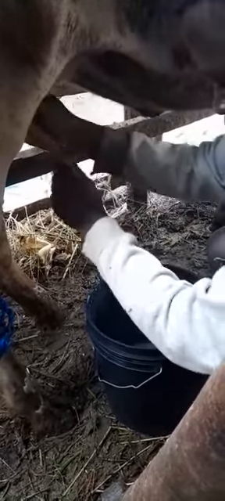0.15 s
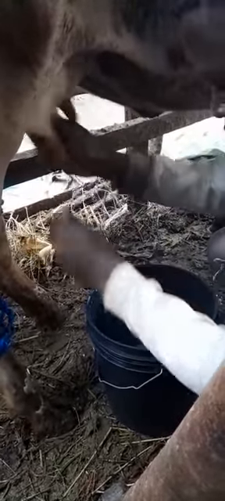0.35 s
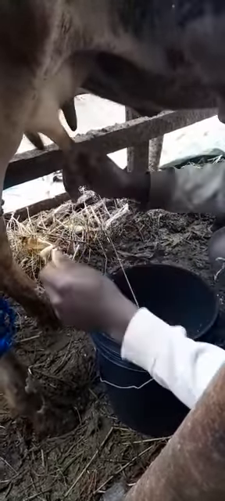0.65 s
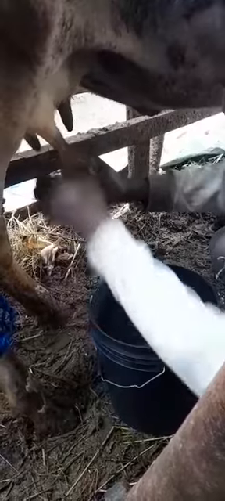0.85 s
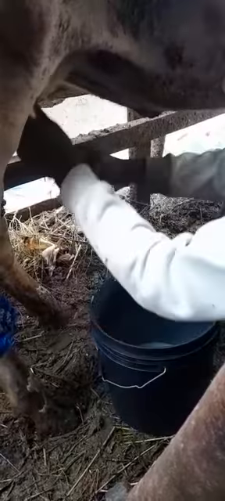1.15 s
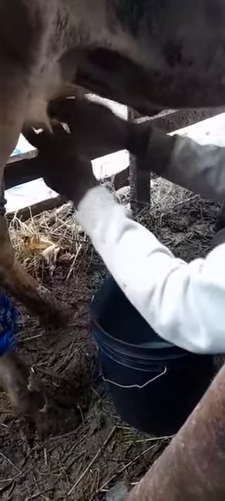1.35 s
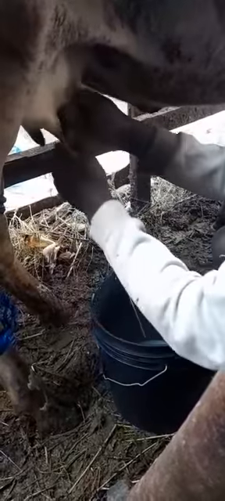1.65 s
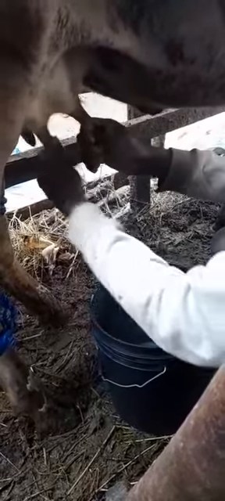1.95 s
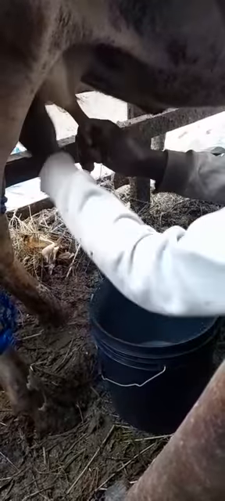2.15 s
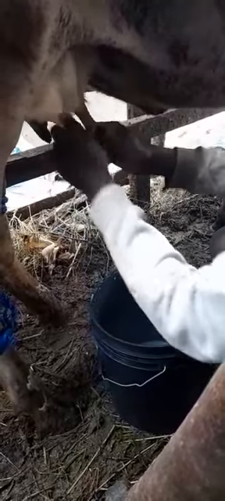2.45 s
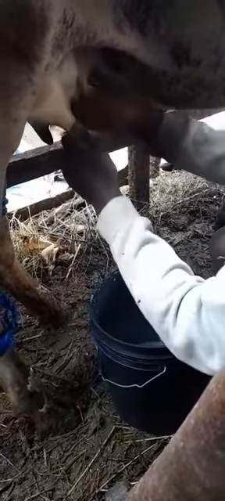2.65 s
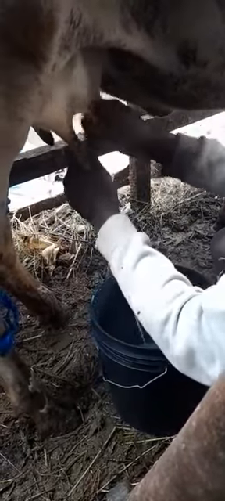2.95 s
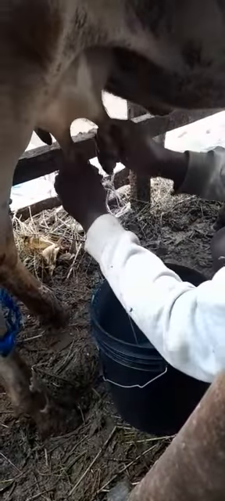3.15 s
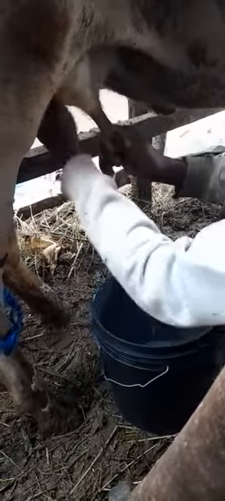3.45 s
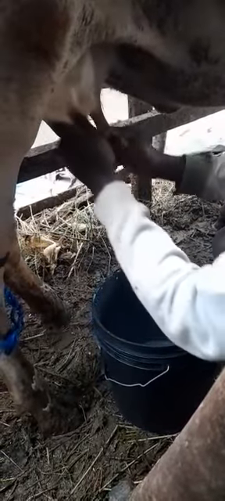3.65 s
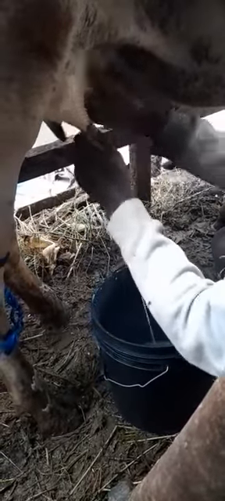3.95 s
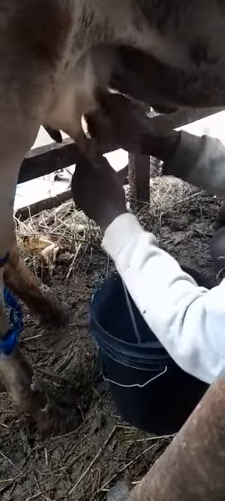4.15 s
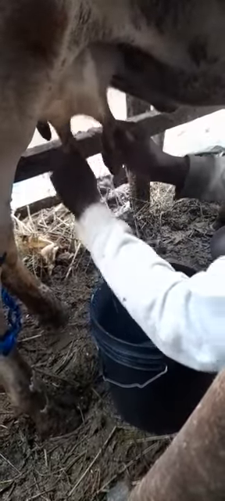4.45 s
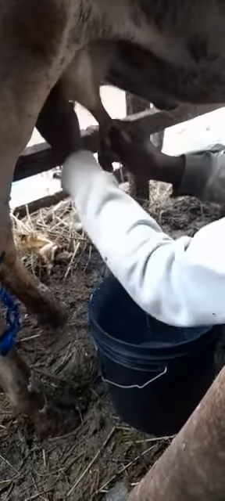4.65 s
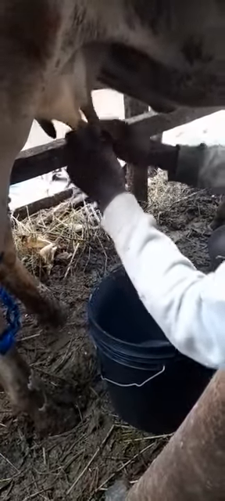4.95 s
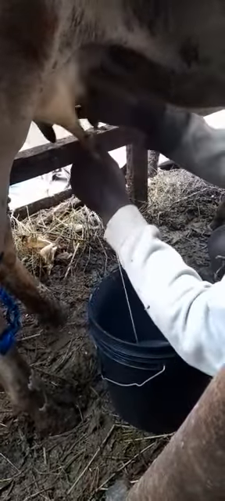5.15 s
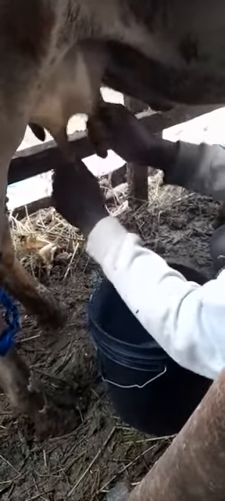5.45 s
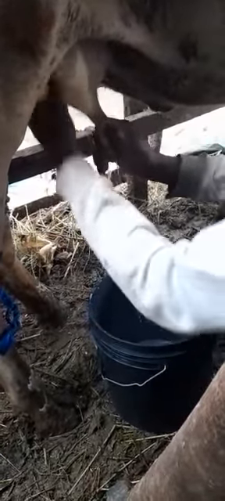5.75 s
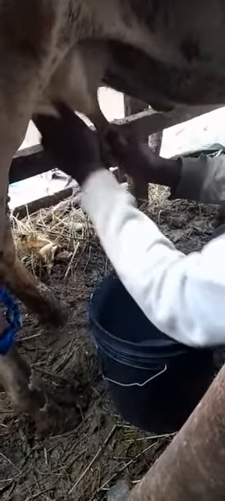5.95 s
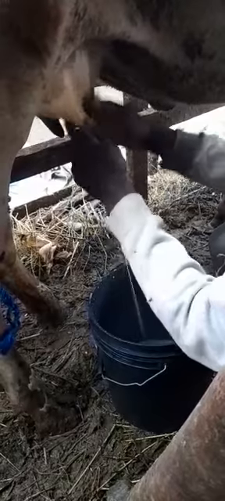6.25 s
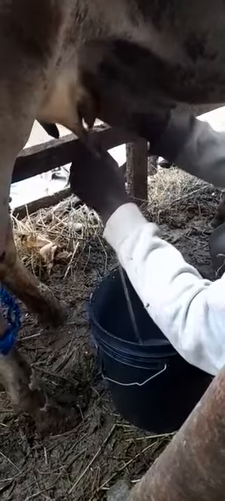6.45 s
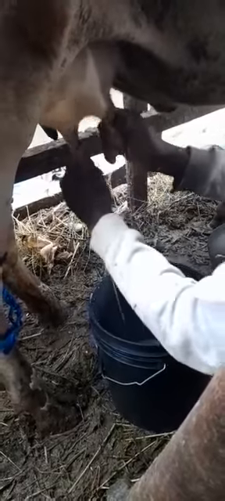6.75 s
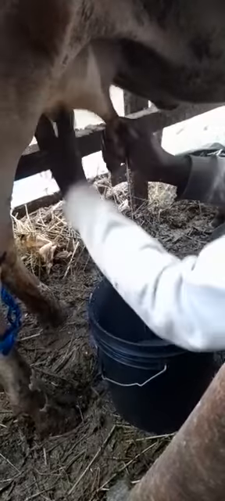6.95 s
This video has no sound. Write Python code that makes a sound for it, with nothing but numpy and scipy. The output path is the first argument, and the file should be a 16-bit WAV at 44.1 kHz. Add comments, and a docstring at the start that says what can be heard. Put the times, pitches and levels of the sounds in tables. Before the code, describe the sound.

Close up, a cow is hand-milked: wet spurts swish into a pail in uneven pulses, foam crackling and bubbles gurgling between short lulls.

```python
"""Milking a cow by hand

A cow is milked by hand into a plastic bucket, close by, in a quiet straw-floored pen.
Each pull drives a jet into the frothy milk: swarms of chirping bubbles, a fizz of foam clicks
and filtered noise for the dull drumming of the pail. Hard jets bore gurgling hollows, most of them
sinking in pitch; slaps, stray drops and booming gulps join in, and most of it echoes in the bucket."""
import sys
import numpy as np
from scipy import signal
from scipy.fft import rfft, irfft, next_fast_len
from scipy.io import wavfile
from scipy.ndimage import uniform_filter1d, map_coordinates

SR = 44100
rng = np.random.default_rng(int(sys.argv[2]) if len(sys.argv) > 2 else 0)


def generate_wav(sig):
    """Save sig (samples, or channels by samples) to the path in sys.argv[1] as 16-bit PCM at SR."""
    pcm = np.round(np.clip(np.atleast_2d(sig).T, -1, 1) * 32767).astype(np.int16)
    wavfile.write(sys.argv[1], SR, pcm)


N = 313551  # length [samples]


def amp(db):
    """Turn decibels into a gain."""
    return 10 ** (np.asarray(db) / 20)


def unit(x):
    """Scale to an rms (average strength) of 1."""
    return x / np.sqrt(np.mean(x ** 2) + 1e-20)


def along(points, hz):
    """Read a curve of (frequency [Hz], value) points on a log frequency axis."""
    f, v = np.transpose(points)
    return np.interp(np.log(hz + 1), np.log(f + 1), v)


def wobble(rate):
    """A smooth random curve with `rate` random points a second."""
    points = rng.standard_normal(int(N * rate / SR) + 4)
    return map_coordinates(points, [np.arange(N) * rate / SR])


def coloured(x, spectrum, modes=()):
    """Filter with a broad tone curve plus resonant humps or dips; nothing sounds before its cause."""
    m = 2 * next_fast_len(N // 2 + SR // 4)
    hz = np.fft.rfftfreq(m, 1 / SR)
    db = along(spectrum, hz)
    for centre, width, boost in modes:
        db = db + boost / (1 + (2 * (hz - centre) / width) ** 2)
    # folding the cepstrum forward in time gives the filter its minimum phase
    cepstrum = irfft(np.log(amp(db)))
    cepstrum[1:m // 2] *= 2
    cepstrum[m // 2 + 1:] = 0
    response = np.exp(rfft(cepstrum))
    return irfft(rfft(x, m) * response, m)[..., :N]


# how alike left and right are: (frequency [Hz], likeness [0 to 1])
LIKENESS = [(60, 0.91), (280, 0.93), (600, 0.6), (1200, 0.098), (3000, 0.12), (12000, 0.2)]


def spread(pair):
    """Mix two signals into left and right, nearly alike in the bass and wide higher up."""
    a, b = rfft(pair)
    likeness = along(LIKENESS, np.fft.rfftfreq(N, 1 / SR))
    turn = np.arccos(np.clip(likeness, -1, 1)) / 2
    mid, side = a * np.cos(turn), b * np.sin(turn)
    return irfft(np.array([mid + side, mid - side]), N)


def steady(pair, size=3000):
    """Hold the short-term rms of the centre near 1, keeping the fine grain; size in samples."""
    power = uniform_filter1d(uniform_filter1d(pair.mean(0) ** 2, size), size)
    return pair / np.sqrt(np.abs(power) + power.mean() / 10 ** 4)


def bubbles(at, hz, gain, cycles, rise, size=256):
    """Damped sines that start at given samples and chirp upward as bubbles near the surface."""
    k = np.arange(size)
    turns = hz[:, None] * k / SR
    age = turns / cycles
    ring = np.sin(2 * np.pi * turns * (1 + rise * age / (1 + age)))
    wave = gain[:, None] * np.exp(-age) * ring * (1 - k / size)
    return np.bincount((at[:, None] + k).ravel(), wave.ravel(), N + size)[:N]


def walls(x, t60, direct, late_db, late_t60, drift=0.51, size=512):
    """Echoes in the bucket and a faint tail from the pen; paths drift as the jet wanders; t60s in s."""
    t = np.arange(8 * size) / SR
    pieces = np.pad(x, (0, -N % size)).reshape(-1, size)
    paths = rng.standard_normal((2, len(pieces), len(t)))
    # each moment keeps most of the last one's paths
    paths = signal.lfilter([1], [1, -np.exp(-drift ** 2)], paths, axis=1)
    echo = paths * (amp(-60 * t / t60) + amp(late_db - 60 * t / late_t60))
    echo /= np.linalg.norm(echo, axis=2, keepdims=True)
    echo[:, :, 0] += direct
    heard = signal.fftconvolve(pieces[None], echo, axes=2)
    # lay the overlapping pieces back in a row
    at = np.arange(len(pieces))[:, None] * size + np.arange(heard.shape[2])
    return np.array([np.bincount(at.ravel(), side.ravel())[:N] for side in heard])


# tone of the still air: (frequency [Hz], relative level [dB])
AIR_TONE = [(15, -45), (25, -25.5), (137, 4), (416, -19), (463, -16.5), (1560, -20), (4870, -14),
            (7510, -31.5), (14000, -27.5), (16000, -47)]
# a faint far drone: (frequency [Hz], rms level [dB])
DRONE = [(63, -81.5), (139, -77.5)]


def pen(air_db, waver):
    """Faint outdoor air is filtered noise; the drone is sines whose phase wavers (in radians)."""
    t = np.arange(N) / SR
    drone = np.zeros(N)
    for hz, db in DRONE:
        drone += amp(db) * np.sqrt(2) * np.sin(2 * np.pi * hz * t + waver * wobble(4.1))
    air = unit(coloured(spread(rng.standard_normal((2, N))), AIR_TONE))
    return amp(air_db) * air + drone


# tone of the drumming: (frequency [Hz], relative level [dB])
DRUM_TONE = [(25, -23.5), (60, -5), (110, -3.5), (200, -5.5), (330, -3), (380, -6.5), (500, -4.5), (800, 1),
             (1600, -69.5)]
# resonances of the pail and its load: (frequency [Hz], width [Hz], boost [dB])
PAIL_RINGS = [(139, 11, 9), (210.4, 22, 7), (268, 35, 10.5), (315, 26.5, 10.5)]


def drumming(push_db, level_db, flutter_db):
    """The uneven push of the jet, as fluttering noise, shakes the pail and the air column in it."""
    force = spread(rng.standard_normal((2, N))) * amp(flutter_db * wobble(45))
    return unit(coloured(force, DRUM_TONE, PAIL_RINGS)) * amp(push_db + level_db)


# heavy gulps that boom in the pail: (time [s], relative level [dB])
GULP_TIMES = [(0.572, -46), (1.985, -41), (2.891, -47), (3.69, -38), (4.548, -46), (5.42, -39),
              (5.876, -36)]


def gulps(level_db, t60):
    """A big pocket of air caves in and sets the pail booming: a low sine that dies away."""
    t = np.arange(N) / SR
    out = np.zeros(N)
    for s, db in GULP_TIMES:
        age = np.maximum(t - s, 0)
        hz = 275 * (1 + 0.021 * rng.standard_normal())
        swell = (1 - np.exp(-age / 0.0016)) * amp(db + level_db - 60 * age / t60)
        out += swell * np.sin(2 * np.pi * hz * age)
    return out


def droplets(fizz_db, level_db, scatter_db, count=260):
    """Stray beads of spray click against the bucket's wall, louder when the froth is busy."""
    at = rng.integers(0, N, count)
    click_db = fizz_db[at] + level_db + scatter_db * rng.uniform(-1.1, 1, count)
    gain = amp(click_db) * rng.choice([-1, 1], count)
    tone = [(500, -21.5), (1500, 1), (5000, 10), (8000, -16.5), (12000, 3.5), (16000, -9.5)]
    ticks = coloured(np.bincount(at, gain, N), tone)
    return walls(ticks, t60=.014, direct=.7, late_db=-27.5, late_t60=.12)


# tone of the fizz: (frequency [Hz], relative level [dB])
FOAM_TONE = [(3000, -15), (6000, -1), (8500, -9), (10500, -1.5), (12300, 1), (14000, -0.5), (16000, -7.5)]
# larger cells of froth that snap: (time [s], relative level [dB])
SNAP_TIMES = [(0.4825, -46), (0.6975, -22), (0.858, -22.5), (2.338, -54), (2.781, -23.5), (3.628, -21.5),
              (3.6998, -28.5), (3.881, -22.5), (3.9631, -22), (4.0546, -17.5), (4.209, -21), (4.6156, -30),
              (5.07, -22), (6.2798, -30)]


def foam(fizz_db, level_db, scatter_db, clump_db, clump_t60, snap_db, count=40000, size=1100):
    """Froth bursts as clumped clicks: one cell goes and its neighbours follow; snaps are short noise."""
    t = np.arange(SR // 20) / SR
    collapse = amp(-60 * t / clump_t60)
    starts = np.bincount(rng.integers(0, N, size), amp(clump_db * rng.standard_normal(size)), N)
    # a constant share of clicks falls outside the clumps
    clumps = np.sqrt(np.abs(signal.fftconvolve(starts ** 2, collapse ** 2)[:N]) + 1.3)
    cells = amp(scatter_db * rng.standard_normal(count)) * rng.choice([-1, 1], count)
    clicks = np.bincount(rng.integers(0, N, count), cells, N) * clumps
    pops = steady(clicks[None])[0] * amp(fizz_db + level_db)
    for s, db in SNAP_TIMES:
        snap = amp(db + snap_db - 60 * t / 0.018) * rng.standard_normal(len(t))
        pops[int(s * SR):][:len(t)] += snap
    return coloured(walls(pops, t60=0.014, direct=0.19, late_db=-18.5, late_t60=0.14, drift=0.68), FOAM_TONE)


# spurts that slap the surface, and last drops after a pull:
# (time [s], relative level [dB], middle pitch [Hz], time to die by 60 dB [s])
SLAP_TIMES = [(0.187, -28.5, 3800, 0.032), (0.543, -37, 3800, 0.033), (0.562, -23, 2610, .04),
              (0.5728, -14.5, 1260, 0.045), (1.4496, -50.5, 4570, .12), (1.5428, -30.5, 2400, 0.066),
              (1.5757, -22.5, 2115, 0.099), (1.675, -15.5, 2024, .12), (1.754, -14, 2130, .15),
              (2.053, -34, 3620, 0.036), (2.5026, -44.5, 4430, .06), (2.598, -36, 5260, .05),
              (2.7805, -11, 1930, .06), (3.352, -20, 4340, 0.071), (3.4098, -13, 3700, .055),
              (3.444, -17, 4640, 0.039), (3.468, -13, 2350, 0.21), (3.555, -15, 2600, .16),
              (3.629, -12.5, 3990, .05), (3.8817, -20, 3330, .035), (4.141, -16.5, 4200, 0.18),
              (4.714, -10, 1994, .16), (5.122, -13.5, 2275, .14), (5.2082, -14.5, 2090, .07),
              (5.7007, -12.5, 2970, .04), (5.8005, -14, 2740, 0.1), (5.87, -16, 3800, .09),
              (5.929, -16, 2760, 0.13), (6.008, -18.5, 3200, .09), (6.2125, -26, 5280, 0.022),
              (6.3023, -12.5, 2155, .09), (6.3974, -18.5, 3820, .06), (6.921, -21.5, 4500, 0.054)]


def slaps(level_db, spray_db, soft, count=70):
    """A spurt lands as a dying cluster of bubbles with clicks of spray; a long one swells in softly."""
    out = np.zeros(N)
    for s, db, pitch_hz, t60 in SLAP_TIMES:
        age = np.linspace(0, 1, count) ** 1.6 * t60 * .5
        at = np.clip(((s + age) * SR).astype(int), 0, N - 1)
        swell = 1 - np.exp(-age / (soft * t60 ** 2))
        gain = rng.choice([-1, 1], count) * amp(-60 * age / t60) * swell
        hz = np.clip(pitch_hz * np.exp(0.31 * rng.standard_normal(count)), 500, 9000)
        spray = amp(spray_db) * np.bincount(at, gain, N)
        burst = bubbles(at, hz, gain, cycles=2.2, rise=0.097) + spray
        out += burst / np.abs(burst).max() * amp(db + level_db)
    out = coloured(out, [(300, -28.5), (800, -13.5), (5500, 0.5), (8000, -11.0), (12000, 0.5)])
    return walls(out, t60=0.025, direct=0.8, late_db=-4, late_t60=0.15)


# hollows bored by hard jets:
# (start [s], end [s], first pitch [Hz], last pitch [Hz], relative level [dB])
HOLLOW_TIMES = [(-.06, 0.081, 875, 862, -25.5), (0.719, 0.874, 2260, 1546, -23),
                (0.797, 1.1, 1580, 1400, -24.5), (.9, 1.202, 2270, 2170, -29.5),
                (1.565, 1.615, 2333, 2180, -32), (2.723, 2.819, 2024, 1756, -34.5),
                (2.954, 3.162, 1500, 1447, -33), (3.975, 4.172, 1780, 1460, -29),
                (4.225, 4.376, 912, 800, -31.5), (4.713, 4.768, 2230, 1494, -27),
                (5.205, 5.29, 2465, 2100, -21.5), (5.276, 5.332, 1515, 763, -22),
                (5.337, 5.478, 850, 865, -25.5), (6.444, 6.538, 2130, 1445, -30.5),
                (6.584, 6.734, 896, 797, -33)]


def hollows(scatter, cycles, level_db, count=60):
    """As a hollow deepens its bubbles mostly sink in pitch; a deep, low hollow rings purer."""
    out = np.zeros(N)
    for start, end, first_hz, last_hz, db in HOLLOW_TIMES:
        u = (np.arange(count) + rng.random(count)) / count  # progress from 0 to 1
        at = ((start + u * (end - start)) * SR).astype(int)
        hz = first_hz * (last_hz / first_hz) ** u
        shallow = hz / 1500
        hz = hz * np.exp(scatter * shallow ** 1.7 * rng.standard_normal(count))
        # bubbles due before the sound begins are silent
        gain = rng.choice([-1, 1], count) * np.sin(np.pi * u) ** .5 * (at >= 0)
        ringing = (cycles / np.minimum(shallow, 1) ** 1.8)[:, None]
        gurgle = bubbles(np.clip(at, 0, N - 1), hz, gain, ringing, rise=0.011, size=2048)
        share = abs(end - max(start, 0)) * SR / N  # part of the whole length it lasts
        out += unit(gurgle) * np.sqrt(share) * amp(db + level_db)
    out = coloured(out, [(300, -27), (700, -6.5), (3000, -2.5), (7000, -33.0)])
    return walls(out, t60=0.049, direct=0.71, late_db=-34.5, late_t60=.16, drift=0.29)


# tone of the splash in the bucket: (frequency [Hz], relative level [dB])
SPLASH_TONE = [(250, -44), (420, -20.5), (620, -16.5), (760, 0.5), (1000, -2.5), (1500, -3.5), (2200, -1),
               (3100, -4), (3800, -4.5), (5300, -4), (6800, -20.5), (9000, -42), (16000, -41)]
# air resonances of the bucket: (frequency [Hz], width [Hz], boost or dip [dB])
BUCKET_RINGS = [(550, 90, 10.5), (871, 20, 5.5), (1102, 65, 6), (1300, 98, -4.5), (1445, 420, 6),
                (2193, 390, 2), (3690, 260, 4.5)]


def splash(jet_db, bright, gurgle, scatter_db, least=0.79, count=11500):
    """The jet breaks into beads; each traps a bubble, with the big ones favoured in a deep plunge."""
    at = rng.integers(0, N, count)
    octave = rng.uniform(-1.92, 1.887, count)
    hz = 1900 * 2 ** octave
    # the very biggest and smallest bubbles gain nothing more from the tilt
    size_db = bright[at] * np.clip(octave, -.8, 1.3) + scatter_db * rng.standard_normal(count)
    swarm = bubbles(at, hz, amp(size_db) * hz, cycles=1.96, rise=.12)
    echoing = walls(swarm, t60=0.037, direct=0.73, late_db=-13, late_t60=0.33, drift=0.33)
    sound = coloured(spread(echoing), SPLASH_TONE, BUCKET_RINGS)
    # energy that goes into a gurgling hollow is taken from the splash, which keeps at least a set share
    power = amp(jet_db) ** 2
    taken = uniform_filter1d(gurgle.mean(0) ** 2, size=2600)
    return steady(sound, size=1300) * np.sqrt(np.maximum(power - taken, abs(least) * power))


THIN_BRIGHT = 0.22  # dB per octave gained for each dB of flow lost: a thin jet traps small bubbles
PLUNGE = 2.3  # dB per octave lost over the hold as the jet bores deeper
FIZZ_FOLLOWS, DRUM_FOLLOWS = 0.65, 0.44  # dB per dB of flow
FIZZ_FADE_DB = 0.5  # over the hold, as the jet clears the froth from its path
DRUM_GROWS_DB = 3.5  # over the hold, as the jet reaches into the body of milk
SURGE_DB, SURGE_RATE = 1.4, 17  # unevenness of the squeeze [dB], and its random points a second
RISE_DB, RELEASE_DB = 26, 30.5  # the flow climbs this far in the rise, drops this far in the release
FIZZ_LEAD_DB = 7  # extra fizz at the start of the rise, as the jet first breaks the froth
# one row per squeeze of the hands, some plunging deep and some grazing the froth; two come up almost dry:
# (start [s], rise [s], hold [s], release [s], splash [relative dB], mid-pull swell [dB],
#  sag over the hold [dB], brightness [dB per octave], fizz [relative dB], drumming [relative dB])
SQUEEZES = [(-.26, 0.078, 0.28, 0.17, -28, 4.5, 4.5, -3.5, -41, -48.5),
            (0.363, 0.027, .06, .2, -71.5, 0.5, -6.5, 16, -76, -88),
            (0.489, 0.11, 0.6, 0.064, -29, 6, 4.5, -2, -44.5, -53.5),
            (1.517, 0.077, .38, 0.18, -41.5, 6.5, -4, -2, -50.5, -57.5),
            (2.329, 0.022, 0.034, 0.47, -57, 4, 1.5, 9, -60, -75.5),
            (2.595, 0.07, .46, 0.27, -29.5, 1, 0.5, -1, -43.5, -50.5),
            (3.193, 0.15, 0.27, 0.43, -37, 2, -5, 2.5, -45.5, -53.5),
            (3.856, 0.072, 0.46, 0.27, -28.5, 4.5, 6, -0.7, -41, -49.5),
            (4.402, 0.066, 0.44, 0.16, -31, 1.5, 5, 1.5, -41.5, -50),
            (5.053, 0.082, 0.31, .16, -31.5, 1.5, -1, -2, -44, -51),
            (5.528, 0.08, 0.49, 0.31, -35, 5, 1, 2.5, -44, -54),
            (6.249, 0.071, 0.4, 0.33, -33, 4.5, -0.5, -2, -45, -51),
            (6.802, 0.039, 0.33, .2, -36, 1, -7, 3, -45.5, -52.5)]


def jets():
    """Each squeeze rises, swells, sags and lets go; its flow sets splash, bubble size, fizz and drumming."""
    t = np.arange(N) / SR
    columns = np.transpose(SQUEEZES)[:, :, None]
    start, rise, hold, release, splash_db, swell_db, sag_db, tilt, fizz_db, drum_db = columns
    held = t - start - rise
    u = np.clip(held / hold, 0, 1)  # progress through the hold
    opening = np.clip(-held / rise, 0, 1)
    closing = np.maximum(held - hold, 0) / release
    flow_db = swell_db * (1 - (2 * u - 1) ** 2) - sag_db * u
    flow_db = flow_db - RISE_DB * opening - RELEASE_DB * closing
    flow_db = flow_db + SURGE_DB * wobble(SURGE_RATE)

    def power(db):
        """Power of each squeeze, practically nil before it starts."""
        return amp(np.maximum(db, -200)) ** 2 * (t >= start) + 1e-20

    def total_db(p):
        """Add up the squeezes and return decibels."""
        return 10 * np.log10(p.sum(0))

    jet = power(splash_db + flow_db)
    fizz = power(fizz_db + FIZZ_FOLLOWS * flow_db + FIZZ_LEAD_DB * opening - FIZZ_FADE_DB * (u - .5))
    push = power(drum_db + DRUM_FOLLOWS * flow_db + DRUM_GROWS_DB * (u - .5))
    tilts = tilt - THIN_BRIGHT * np.clip(flow_db, -RELEASE_DB, 0) - PLUNGE * (u - .5)
    bright = np.average(tilts, axis=0, weights=jet)  # the strongest jet counts most
    return total_db(jet), bright, total_db(fizz), total_db(push)


# balance of the milking sounds: (frequency [Hz], left minus right [dB])
BALANCE = [(200, 0.8), (380, 0.5), (750, -4), (1200, -2), (2300, -9), (3000, -2), (3900, -14.5),
           (5300, -7.5), (7000, 7), (9000, 7.5), (12000, -3.5), (15000, 7)]


def scene():
    """The jets drive splash, fizz, drumming and droplets; the middle pitches lean right, the top left."""
    jet_db, bright, fizz_db, push_db = jets()
    gurgle = hollows(scatter=0.047, cycles=6.4, level_db=-2.5)
    milk = gurgle + amp(-0.68) * splash(jet_db, bright, gurgle, scatter_db=3.5)
    milk += foam(fizz_db, level_db=7.5, scatter_db=6.0, clump_db=4, clump_t60=0.0078, snap_db=2.0)
    milk += droplets(fizz_db, level_db=22.5, scatter_db=6)
    milk += slaps(level_db=-1.5, spray_db=-2.0, soft=.7)
    milk += drumming(push_db, level_db=1, flutter_db=2.0)
    milk += gulps(level_db=1, t60=.16)
    left = coloured(milk[0], [(hz, db / 2) for hz, db in BALANCE])
    right = coloured(milk[1], [(hz, -db / 2) for hz, db in BALANCE])
    return np.array([left, right]) + pen(air_db=-68.5, waver=.8)


TOP_HZ = 15950  # highest frequency kept [Hz]


def record(dry):
    """The microphone keeps nothing above its band limit."""
    m = next_fast_len(N + SR // 2)
    kept = np.fft.rfftfreq(m, 1 / SR) < TOP_HZ
    return irfft(rfft(dry, m) * kept, m)[:, :N]


dry = scene()
out = record(dry)
generate_wav(out)
```